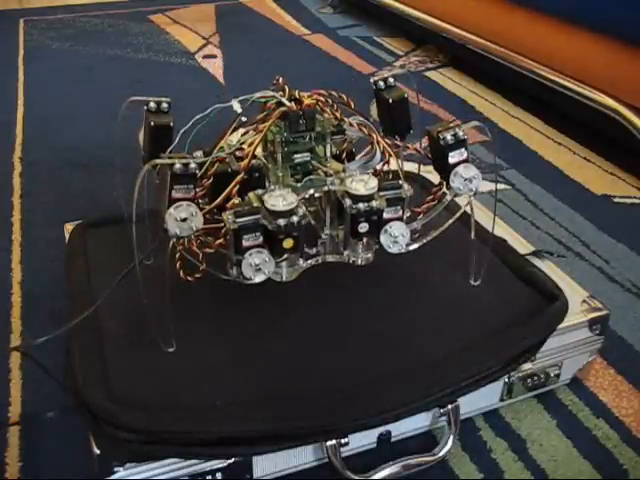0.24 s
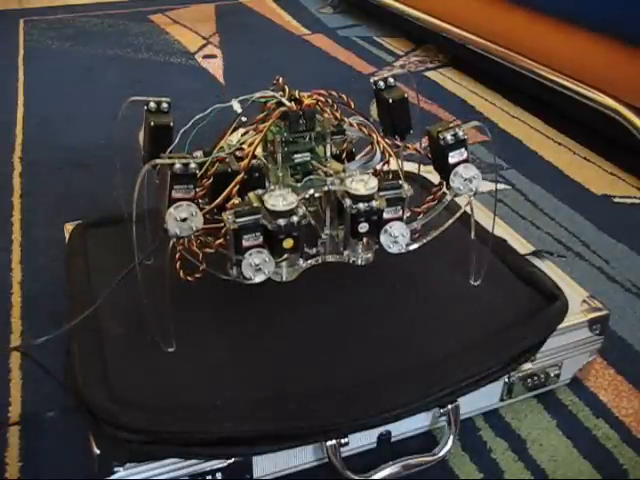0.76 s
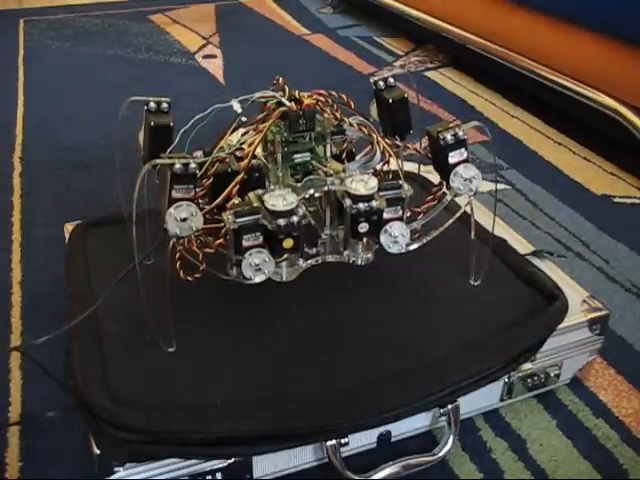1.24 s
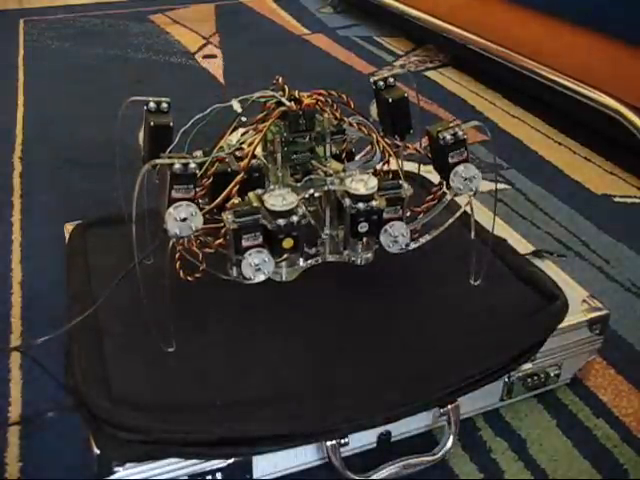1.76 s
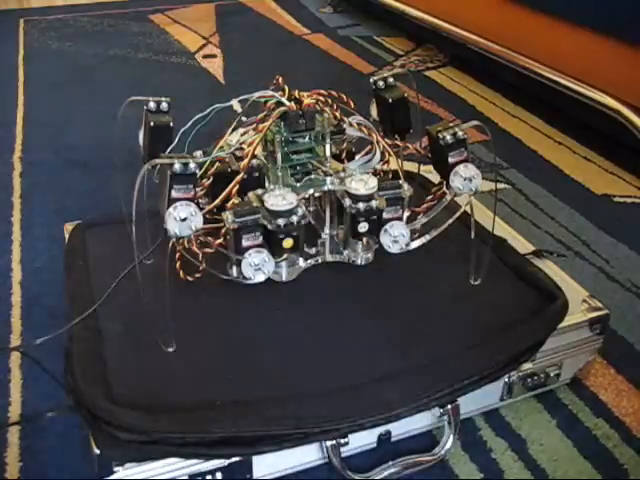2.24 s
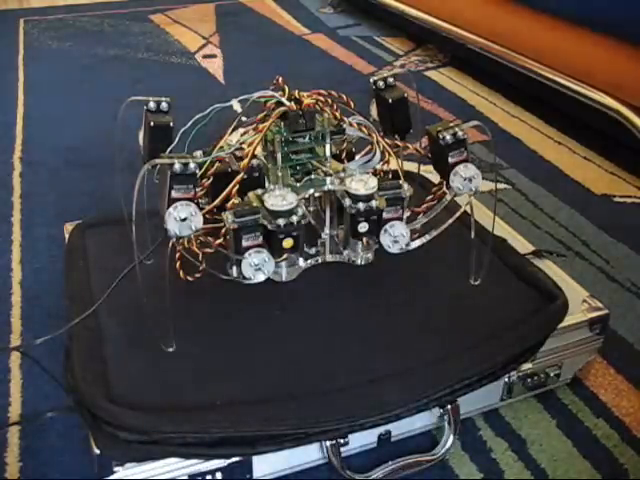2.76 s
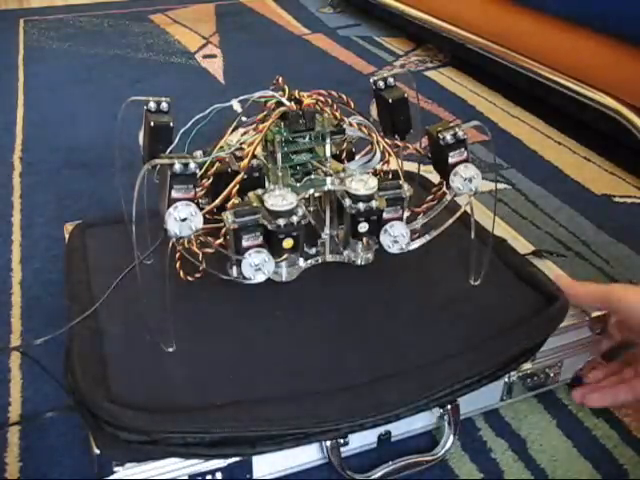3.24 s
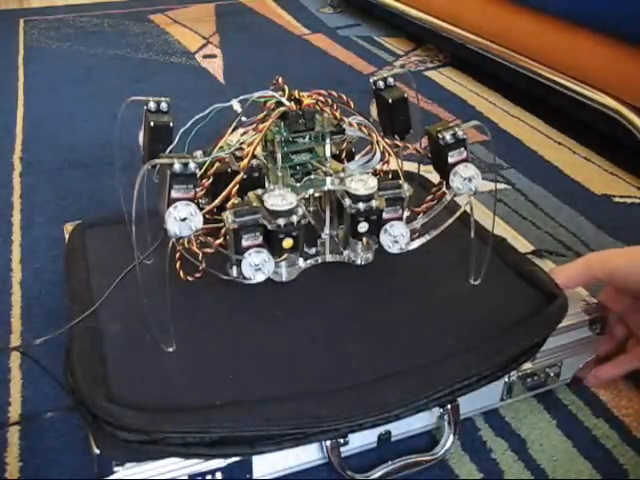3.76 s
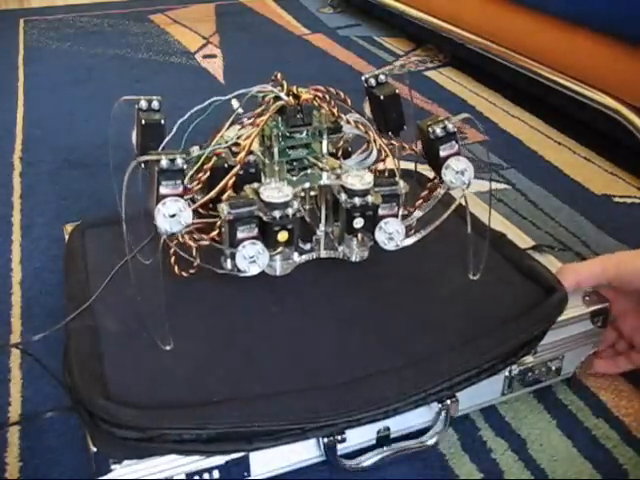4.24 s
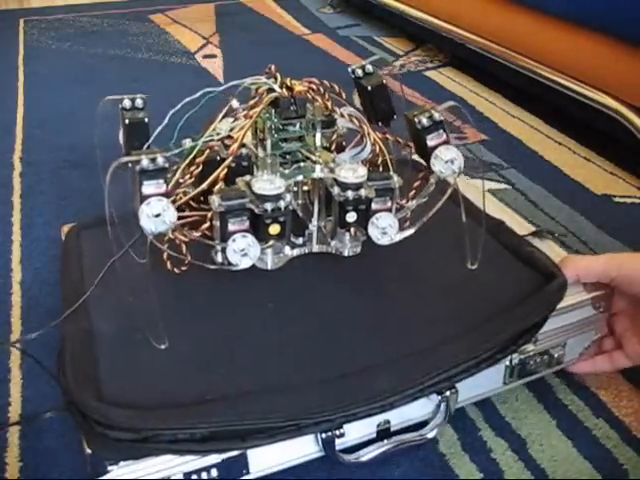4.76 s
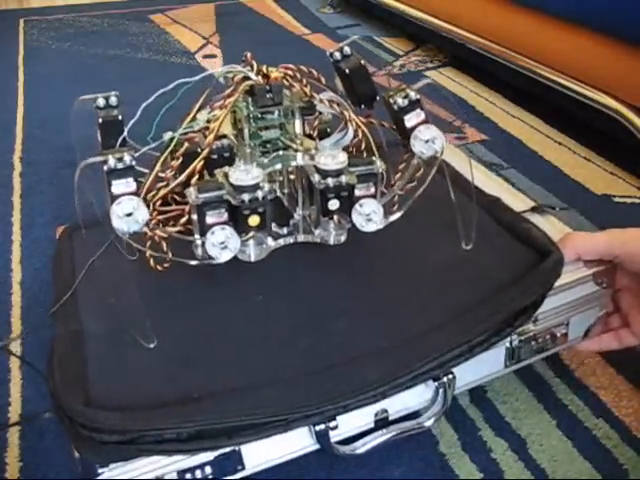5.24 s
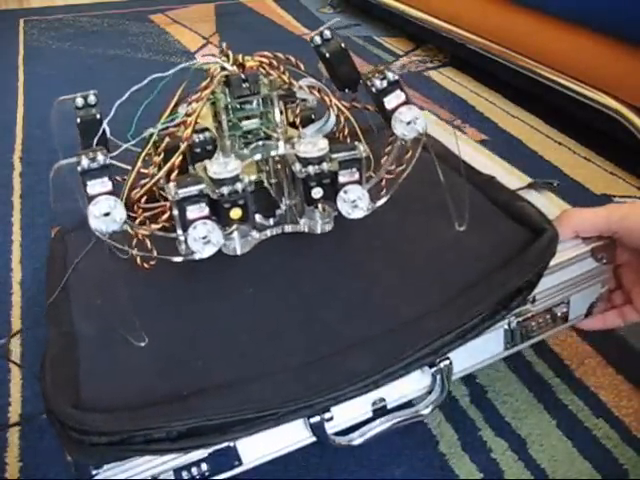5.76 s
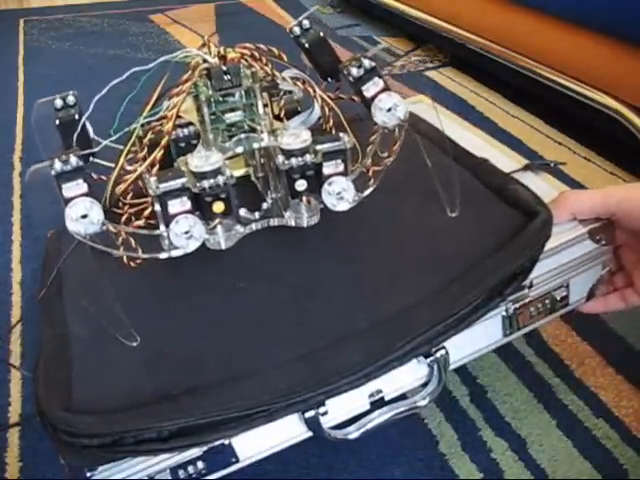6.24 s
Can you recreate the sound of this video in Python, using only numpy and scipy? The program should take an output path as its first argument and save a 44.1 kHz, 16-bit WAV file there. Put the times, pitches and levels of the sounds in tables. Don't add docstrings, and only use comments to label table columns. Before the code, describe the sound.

Close up in a carpeted room, a small robot's servos hum low in irregular pulses with a faint gear whirr. A light knock comes first, then a dense, loud clatter of knocks and scrapes on a hollow case with low booms, then a dry latch snap. The humming continues with a few faint scuffs. The cheap microphone is coarse, hissy and whining, and dips in level after the blows.

```python
import sys
import numpy as np
from scipy import signal
from scipy.io import wavfile
from scipy.ndimage import uniform_filter1d

SR = 44100
rng = np.random.default_rng(int(sys.argv[2]) if len(sys.argv) > 2 else 0)


def transcribe(u):
    v = np.clip(np.atleast_2d(u).T, -1, 1)
    q = np.round(v * 32767).astype(np.int16)
    wavfile.write(sys.argv[1], SR, q)


def ratio_of_db(decibels):
    return 10 ** (np.asarray(decibels, float) / 20)


N = 286650
T = np.arange(N) / SR


def unit(x):
    return x / np.sqrt(np.mean(x ** 2))


def band(x, lo_hz, hi_hz):
    return signal.sosfilt(signal.butter(2, [lo_hz, min(hi_hz, .45 * SR)], "band", fs=SR, output="sos"), x)


def hiss(lo_hz, hi_hz):
    return unit(band(rng.standard_normal(N), lo_hz, hi_hz))


def walk(rate_hz):
    k = int(SR / rate_hz)
    steps = np.repeat(rng.standard_normal(N // k + 1), k)
    return 1.2 * uniform_filter1d(uniform_filter1d(steps, k), k)[:N]


def tone(hz):
    return np.sqrt(2) * np.sin(2 * np.pi * np.cumsum(hz * np.ones(N)) / SR)


def fade(t, t60):
    return np.exp(-np.log(1000) * t / max(t60, .001))


def add(out, s, x):
    i = int(s * SR)
    out[i:i + len(x)] += x[:N - i]


# start in seconds, length in seconds, hum level in dB.
HOLDS = [(0, .12, -44), (0.242, .09, -44.5), (0.497, 0.23, -42), (.84, 0.49, -48.5), (1.407, 0.19, -39),
         (1.693, 0.33, -41), (2.186, 0.11, -42), (2.351, .61, -40.5), (2.999, 0.49, -45.5),
         (3.504, 0.49, -42), (4.02, 0.42, -40), (4.46, 0.061, -44.5), (4.54, 0.28, -40.5),
         (4.92, 0.066, -38.5), (5.254, 0.2, -43.5), (5.596, 0.14, -41.5), (5.817, 0.66, -39)]


def servo_hum():
    idle_db, grip_s = -51.5, .04
    db = idle_db + 1.5 * walk(15)
    for s, length, hold_db in HOLDS:
        strain = np.clip(np.minimum(T - s, s + length - T) / grip_s + .5, 0, 1)
        db = db + (hold_db - idle_db) * strain
    hz = 250.1 - .65 * T + 0.86 * walk(12) + 1.2 * walk(3)
    return ratio_of_db(db) * tone(hz)


# centre in Hz, width in Hz, level in dB.
FRAME = [
    (219.7, 5.4, -57.5),
    (294.2, 8, -59),
    (541.6, 45, -49.5),
    (848, 110, -52.5),
    (1448.4, 150, -57),
]


def frame():
    out = 0
    for hz, width_hz, db in FRAME:
        out = out + ratio_of_db(db + 1.8 * walk(4)) * hiss(hz - width_hz / 2, hz + width_hz / 2)
    return out


# start in seconds, peak in dB, ring in Hz, ring t60 in seconds.
RINGS = [(1.3462, -16, 1700, 0.012), (1.368, -24, 1420, 0.014), (1.861, -24, 1490, 0.025),
         (1.8812, -5.5, 940, 0.013), (1.9045, -7, 2250, 0.048), (1.908, -27, 4470, 0.075),
         (1.938, -13, 1487, 0.029), (2.062, -20.5, 382, 0.061), (2.084, -5.5, 1972, 0.036),
         (2.2169, -3, 860, 0.032), (2.221, -16.5, 578, 0.15), (2.25, -20.5, 930, 0.14),
         (3.942, -20.5, 880, .012), (6.19, -34, 970, 0.025)]
# start in seconds, peak in dB, ring in Hz, ring t60 in seconds.
THUMPS = [(1.88, -14.5, 408, .03), (1.8845, -7, 1660, 0.013), (1.941, -17.5, 467, 0.075),
          (1.955, -22, 2220, 0.044), (1.9995, -6.5, 1970, 0.023), (2.004, -19, 1030, 0.036),
          (2.034, -20, 954, .052), (2.054, -25, 1374, 0.056), (2.095, -25.5, 435, 0.1),
          (2.113, -26.5, 1830, 0.14), (2.226, -13, 1310, 0.035), (2.443, -22.5, 987, 0.051),
          (2.553, -30, 580, 0.037), (2.83, -29.5, 1530, 0.028), (6.146, -27.5, 1400, 0.014)]
# start in seconds, peak in dB, ring in Hz, ring t60 in seconds.
TICKS = [(1.3465, -27, 2210, 0.014), (1.379, -34, 2130, 0.026), (1.805, -29.5, 1780, 0.011),
         (1.831, -37, 1200, 0.085), (2.0842, -17.5, 3500, 0.01), (2.213, -37, 1320, .03),
         (2.219, -22, 2110, .06), (2.6755, -24, 2370, 0.019), (2.878, -37, 1550, 0.032),
         (3.1255, -22, 3190, .025), (3.152, -35, 2800, 0.039), (3.963, -34, 2980, .009)]
# start in seconds, peak in dB, ring in Hz, ring t60 in seconds.
BOOMS = [
    (1.95, -20.5, 165, 0.26),
    (2.219, -28.5, 181, 0.25),
    (2.445, -22.5, 180, 0.049),
]


def knocks():
    return (struck(RINGS, ring_db=0, body_db=-11.5, crack_db=-21)
            + struck(THUMPS, ring_db=0, body_db=-0.9, crack_db=-11.5)
            + struck(TICKS, ring_db=-2.5, body_db=-14, crack_db=0)
            + struck(BOOMS, ring_db=0, body_db=-28, crack_db=-30.5))


def struck(rows, ring_db, body_db, crack_db):
    out, t = np.zeros(N), T[:SR // 4]
    for s, db, hz, t60 in rows:
        noise = rng.standard_normal((3, len(t)))
        strike = np.sin(2 * np.pi * hz * t) * fade(t, .5 * t60) * np.minimum(t / .0006, 1)
        wide_hz = min(.22 * hz, 232)
        rough = unit(band(noise[0], hz - wide_hz, hz + wide_hz)) * fade(t, 1.6 * t60)
        ring = strike + .38 * rough
        body = unit(band(noise[1], 280, 800)) * fade(t, 2.5 * t60) * np.minimum(t / .002, 1)
        top_hz = 1.5 * hz
        crack = band(noise[2], max(1000, .5 * hz), 1700 + top_hz)
        crack = unit(band(crack, 700, 2200 + top_hz)) * fade(t, 1.3 * t60) * np.minimum(t / .0004, 1)
        blow = ratio_of_db(ring_db) * ring + ratio_of_db(body_db - 4) * body + ratio_of_db(crack_db) * crack
        add(out, s, ratio_of_db(db) * blow)
    return out


# start in seconds, peak in dB.
SNAP = [
    (1.3795, -27),
    (2.6757, -20),
    (3.03993, -2),
    (3.0412, -23),
    (3.0426, -21),
    (3.1238, -18),
    (6.1465, -27),
]


def latch():
    out, t = np.zeros(N), T[:SR // 50]
    for s, db in SNAP:
        add(out, s, ratio_of_db(db) * np.sin(2 * np.pi * 2500 * t + .9) * fade(t, .0015))
    return out


# start in seconds, length in seconds, level in dB,
# treble share in dB, change over its length in dB.
SCRAPES = [
    (1.341, 0.11, -31, -3, -8),
    (1.778, 0.096, -43, -7.5, 19),
    (1.876, 0.11, -26, 0.5, -2),
    (1.984, .2, -27, -0.5, -8.5),
    (2.212, 0.21, -26.5, -3.5, -14),
    (2.43, 0.3, -36, -10, -5),
    (3.11, .08, -47, 7, 2),
    (3.938, 0.067, -40, -13, -7),
    (6.136, 0.06, -40.5, 1, -9),
]


def drag():
    out = 0
    for s, length, db, treble_db, change_db in SCRAPES:
        on = uniform_filter1d(1. * ((T > s) & (T < s + length)), size=500)
        grit = rng.standard_normal(N) * ratio_of_db(4.5 * walk(200))
        body = unit(band(grit, 250, 1500))
        panels = ratio_of_db(treble_db) * unit(band(grit, 1000, 4000))
        boom = ratio_of_db(-7.5) * unit(band(grit, 110, 230))
        level = on * ratio_of_db(db - 7.5 + change_db * np.clip((T - s) / length, 0, 1))
        out = out + level * (body + panels + boom)
    return out


# start in seconds, peak in dB.
JOLTS = [
    (1.878, -15.5),
    (2.217, -19),
    (3.038, -27),
]


def jolts():
    push_s = .004
    out, t = np.zeros(N), T[T < push_s]
    for s, db in JOLTS:
        add(out, s, -ratio_of_db(db) * np.sin(np.pi * t / push_s) ** 2)
    return out


def echo(x):
    t = T[:SR // 2]
    tail = band(rng.standard_normal(len(t)), 240, 3500) * fade(t, 0.44) * (t > .004)
    return signal.fftconvolve(x, tail / np.sqrt(np.sum(tail ** 2)))[:N]


def mains():
    since = np.maximum(T - 2.3, 0) / 1.2
    shade_db = -11.5 * np.minimum(since / 0.11, 1) * np.exp(-since)
    return ratio_of_db(-50 + shade_db + 3 * walk(5)) * tone(120)


# start in seconds, rumble level in dB, t60 in seconds.
BUMPS = [
    (1.36, -54, 0.96),
    (1.889, -33, 0.56),
    (2.04, -30.5, 0.95),
    (2.55, -40.5, 1),
]


def rumble():
    level = ratio_of_db(-57 - T + 2 * walk(6.6))
    t = T[:SR]
    for s, db, t60 in BUMPS:
        add(level, s, ratio_of_db(db) * np.minimum(t / .0084, 1) * fade(t, t60))
    return level * hiss(24, 90)


# frequency in Hz, density in dB per Hz.
ROOM = [(15, -50), (25, -20), (69, -17), (113, -10), (169, -11), (242, -2), (332, -10), (557, -3),
        (1140, -11.5), (1470, -12), (4410, -29), (4830, -13.5), (5400, -34.5), (7020, -65), (11900, -120)]


def air():
    hz, db = np.transpose(ROOM)
    out, swell = 0, walk(1.6)
    for f in 80 * 2 ** np.arange(0, 6.1, .5):
        band_db = np.interp(np.log(f), np.log(hz), db) + 0.35 * swell + 1.2 * walk(9)
        out = out + ratio_of_db(band_db) * np.sqrt(f) * hiss(f / 2 ** .25, f * 2 ** .25)
    return ratio_of_db(-39) * unit(out)


def scene():
    blows, snap = knocks(), latch()
    robot = servo_hum() + frame()
    handling = blows + snap + drag() + jolts()
    tail = echo(ratio_of_db(-10) * blows + ratio_of_db(-20) * snap)
    return (robot + handling + tail + mains() + rumble() + air())[None]


def whine():
    slip = uniform_filter1d((T - .017) * 30 % 1, size=200)
    return ratio_of_db(-42.5) * np.sin(2 * np.pi * 4740.33 * T - 2 * .62 * slip)


def lag(x, s):
    pole = np.exp(-1 / (s * SR))
    return signal.lfilter([1 - pole], [1, -pole], x)


def gain_control(x):
    knee_db, slope, release_db_per_s = -29, .36, 42
    level_db = 10 * np.log10(uniform_filter1d(x ** 2, size=400) + 1e-12)
    climb_db = release_db_per_s * T
    held_db = np.maximum.accumulate(level_db + climb_db) - climb_db
    cut_db = slope * np.maximum(held_db - knee_db, 0)
    return ratio_of_db(-lag(cut_db, .08) - 0.81 * lag(cut_db, 1.4))


def store(x):
    store_hz, shift, step = 11026, 2.12 / 4, 1 / 128
    held = np.floor(T * store_hz + shift)
    x = np.interp((held + .4 - shift) / store_hz, T, x)
    return step * np.round(x / step)


def roll_off(x):
    return signal.sosfilt(signal.butter(12, 16470, fs=SR, output="sos"), x)


def record(dry):
    x = signal.sosfiltfilt(signal.butter(3, 6000, fs=SR, output="sos"), dry[0])
    x = (x + whine()) * gain_control(x)
    limit = .6
    x = store(limit * np.tanh(x / limit))
    x = signal.sosfiltfilt(signal.ellip(10, .1, 50, 15480, fs=SR, output="sos"), x)
    return roll_off(x[None])


dry = scene()
out = record(dry)
transcribe(out)
```